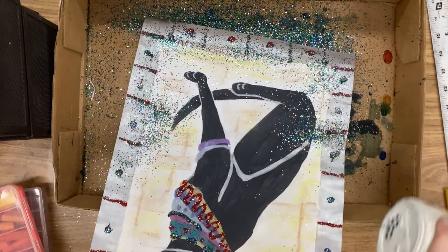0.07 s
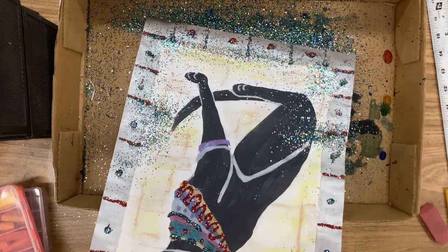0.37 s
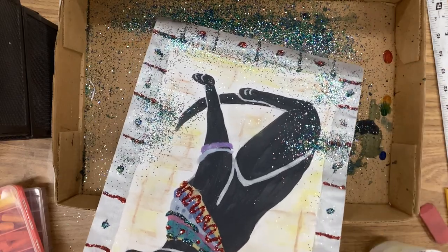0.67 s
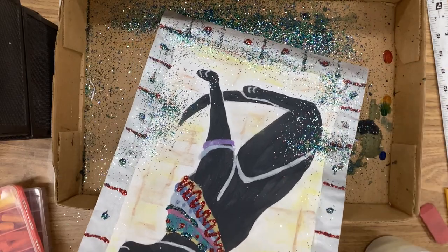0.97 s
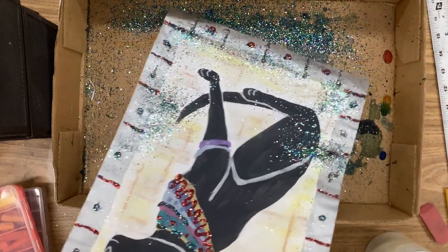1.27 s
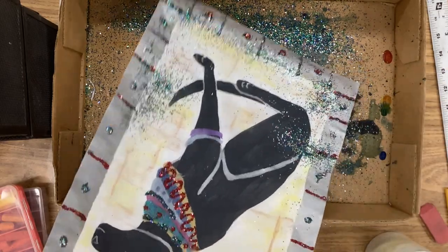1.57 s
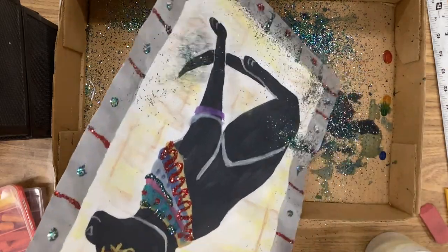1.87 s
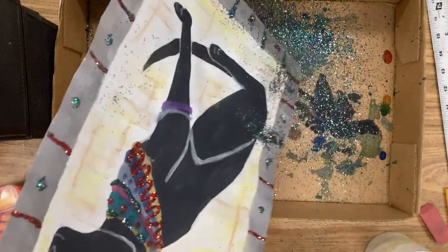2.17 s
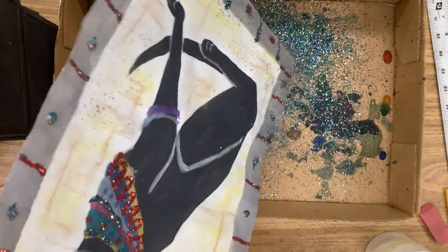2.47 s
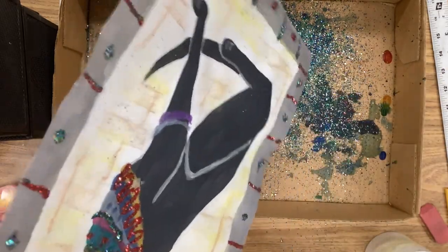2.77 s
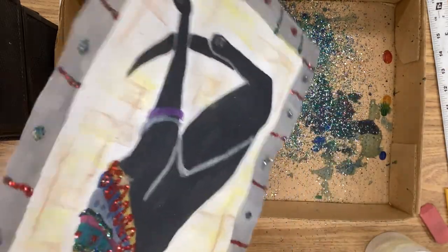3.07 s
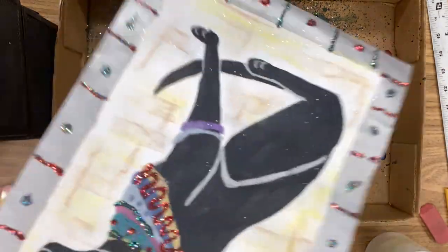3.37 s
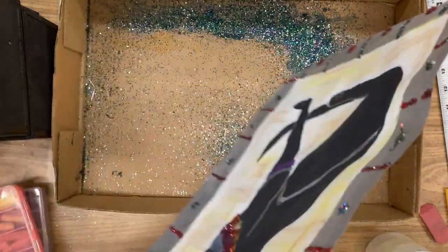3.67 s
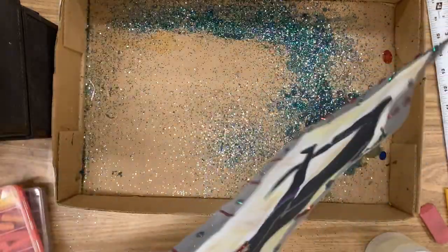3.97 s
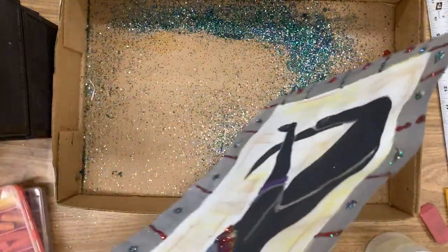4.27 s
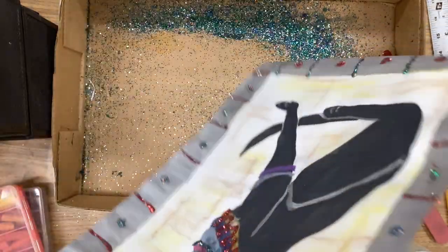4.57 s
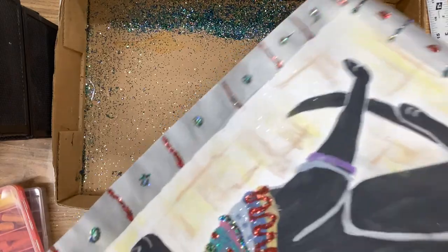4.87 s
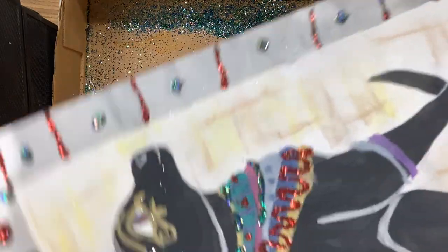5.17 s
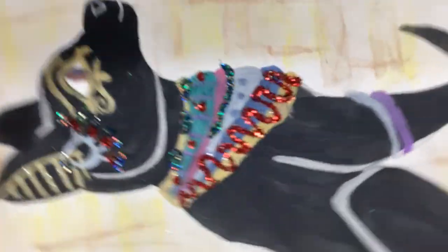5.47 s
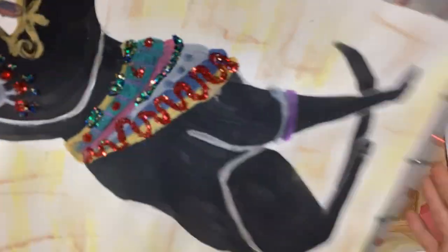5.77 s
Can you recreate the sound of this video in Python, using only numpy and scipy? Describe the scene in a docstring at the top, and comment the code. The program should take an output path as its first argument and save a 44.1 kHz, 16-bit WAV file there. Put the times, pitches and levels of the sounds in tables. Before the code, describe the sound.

Stiff paper scrapes and knocks a cardboard tray, glitter hisses off it, then the sheet is shaken with short snaps.

```python
"""A small room with murmuring ventilation, where a painted sheet is tipped over a cardboard tray.
Its edge scrapes and knocks the tray, and loose glitter hisses off it in thousands of tiny impacts.
Then the stiff paper is shaken clean: it rubs in the hand, creaks, pushes puffs of air and buckles
with short snaps that the room answers. Dry paint and large flakes tick throughout."""
import sys
import numpy as np
from scipy import signal
from scipy.fft import rfft, irfft
from scipy.io import wavfile
from scipy.ndimage import uniform_filter1d

SR = 44100
rng = np.random.default_rng(int(sys.argv[2]) if len(sys.argv) > 2 else 0)


def wrap_up_sound(samples):
    """Save the sound to the file named by the first command line argument, as 16-bit audio."""
    columns = np.atleast_2d(samples).T
    # keep every value between -1 and 1, then stretch to whole-number steps
    tamed = np.clip(columns, -1, 1)
    steps = np.round(tamed * 32767).astype(np.int16)
    wavfile.write(sys.argv[1], SR, steps)


N = 256662

# spectrum of flakes sliding and landing: f/Hz, level/dB
FLAKE_SPECTRUM = [(600, -15), (1400, 0), (2600, 6.5), (3600, 4.5), (4500, -1.5), (5500, -1), (8000, 0),
                  (11500, 0), (15500, -4.5)]
# spectrum of paper scraping cardboard: f/Hz, level/dB
SCRAPE_SPECTRUM = [(200, -16), (450, -10.5), (660, 6), (900, 3.5), (1200, 0.5), (1750, -1), (2050, 1),
                   (2700, 0.5), (3600, -4), (4500, -13), (5300, -9.5), (6200, -18), (14000, -31)]


def amp(db):
    """Decibels to gain."""
    return 10 ** (np.asarray(db) / 20)


def unit(x):
    """Scales to rms 1."""
    return x / np.sqrt(np.mean(x ** 2) + 1e-20)


def read(points, hz):
    """Reads a table on a log-frequency axis."""
    f, value = np.transpose(points)
    return np.interp(np.log(hz + 1), np.log(f), value)


def add(mix, s, sound):
    """Mixes a sound in at time s."""
    part = mix[round(s * SR):][:len(sound)]
    part += sound[:len(part)]


def colour(x, spectrum, size=4096):
    """Minimum-phase EQ with the given spectrum."""
    log_gain = np.log(amp(read(spectrum, abs(np.fft.fftfreq(size, 1 / SR)))))
    taps = np.fft.ifft(np.exp(np.conj(signal.hilbert(log_gain)))).real
    return signal.fftconvolve(x, taps[:size // 2])[:len(x)]


def lowpass(x, hz, order=2):
    """Dulls a sound above hz."""
    return signal.sosfilt(signal.butter(order, min(hz, SR / 2 - 1), fs=SR, output="sos"), x)


def wander(depth_db, up_to_hz):
    """A gain that wavers at random, by depth_db rms."""
    slow = np.fft.rfftfreq(N, 1 / SR) < up_to_hz
    drift = unit(irfft(rfft(rng.standard_normal(N)) * slow, N))
    return amp(depth_db * drift)


def grains(spectrum, per_s, spread_db):
    """A texture of tiny impacts at random moments, most small and a few large, at rms 1."""
    size = amp(spread_db * np.minimum(rng.exponential(1, N), 5))
    impacts = size * rng.standard_normal(N) * (rng.random(N) < per_s / SR)
    return unit(colour(impacts, spectrum))


def burst(envelope, spectrum, bright_hz):
    """A burst of coloured noise with the energy of its envelope."""
    noise = colour(envelope * rng.standard_normal(len(envelope)), spectrum)
    return unit(lowpass(noise, bright_hz, order=3)) * np.sqrt(np.mean(envelope ** 2))


def ring(t, hz, fade_s, rise_s=0.00038):
    """One resonance swings up and dies away."""
    return np.sin(2 * np.pi * hz * t) * (1 - np.exp(-t / rise_s)) * np.exp(-t / fade_s)


def ventilation(level_db=-51.5):
    """Room tone: the steady low murmur of moving air."""
    # spectrum of the murmur: f/Hz, level/dB
    spectrum = [(25, -60), (38, -34), (55, 0), (75, -2.5), (100, -4.5), (140, 5), (200, -4), (400, -10.5),
                (900, -20.5), (1500, -21.5), (2200, -28.5), (4300, -33.5), (6300, -49), (15000, -42)]
    murmur = unit(colour(rng.standard_normal(N), spectrum))
    return amp(level_db) * murmur * wander(0.15, up_to_hz=16)


def strokes(rows, sag_db=-4.5, release_s=0.032):
    """Envelopes of friction and of stirred glitter: each stroke takes hold, slackens and lets go."""
    friction, stirred = np.zeros(N), np.zeros(N)
    t = np.arange(SR) / SR
    for s, length, attack, rub_db, glitter_db in rows:
        hold = np.minimum(t / attack, 1) * amp(sag_db * np.minimum(t / length, 1))
        shape = hold * np.exp(-np.maximum(t - length, 0) / release_s)
        add(friction, s, amp(rub_db) * shape)
        add(stirred, s, amp(glitter_db) * shape)
    return friction, stirred


def rim_drags():
    """Stroke envelopes of the sheet being dragged over the tray's rim."""
    # drags: t/s, length/s, attack/s, scrape level/dB, stirred glitter level/dB
    drags = [(0, 0.085, 0.0013, -58, -48), (.1, 0.28, 0.019, -77, -61.5), (.37, 0.097, .08, -44, -53.5),
             (.48, 0.23, 0.048, -54, -63), (.7, .23, 0.24, -43, -51), (.98, 0.13, 0.056, -43.5, -51),
             (1.15, 0.26, 0.033, -45, -54), (1.42, 0.25, 0.046, -56, -63.5),
             (1.595, 0.2, 0.029, -49.5, -62), (1.82, 0.31, .03, -61, -66)]
    return strokes(drags)


def rubbing(dragging, sliding):
    """Paper fibres catch and slip on the cardboard and on the fingers, under uneven pressure."""
    # spectrum of paper rubbing on skin: f/Hz, level/dB
    finger_spectrum = [(200, -22), (700, -7), (1400, 1), (2000, -3), (2750, 5), (3600, -3), (4600, -4),
                       (5300, -1), (6200, -15.5), (11000, -28), (15000, -37)]
    on_tray = grains(SCRAPE_SPECTRUM, per_s=8000, spread_db=0.1) * dragging
    in_hand = grains(finger_spectrum, per_s=3000, spread_db=2) * sliding
    pressure = wander(1.3, up_to_hz=45)
    return (on_tray + in_hand) * pressure


def glitter(stirred, edge_s=0.06):
    """Thousands of flakes slide and land: one long pour, and a small rush with every stroke."""
    # envelope of the pour off the tilted sheet: t/s, level/dB
    pour_curve = [(1.6, -74), (1.68, -52), (2.07, -50), (2.34, -53), (2.65, -50.5), (2.95, -59), (3.2, -55),
                  (3.45, -72), (3.68, -90)]
    s, db = np.transpose(pour_curve)
    t = np.arange(N) / SR
    outside_s = abs(t - np.clip(t, s[0], s[-1]))
    pour = amp(np.interp(t, s, db)) * np.exp(-outside_s / edge_s)
    hiss = grains(FLAKE_SPECTRUM, per_s=12000, spread_db=1.5)
    coarse_flakes = amp(-17) * grains(FLAKE_SPECTRUM, per_s=45, spread_db=6)
    return (hiss + coarse_flakes) * (pour + stirred) * wander(1, up_to_hz=57)


def early_reflections(x):
    """Nearby surfaces repeat a sound and give it a faintly hollow colour."""
    # echoes off the tray's walls and the table: delay/s, level/dB
    echoes = [(.0019, -24), (.0047, -15.5), (.0083, -22)]
    out = x.copy()
    for delay, db in echoes:
        add(out, delay, amp(db) * x)
    return out


def knocks(scuff_s=0.011, rise_s=0.00057):
    """The sheet's edge lands on the tray: a short scuff, and the cardboard booms."""
    # landings: t/s, boom level/dB, hardness as a cutoff/Hz, ring time factor, scuff level/dB
    landings = [(0.8858, -35, 3000, 0.99, -32), (1.038, -26, 380, 1, -35)]
    # the tray's modes: f/Hz, level/dB, t60/s
    modes = [(192, -12, 0.25), (288.6, -6.5, 0.22), (338, -9.5, 0.37), (397, 8.5, 0.019), (612, -5, 0.22),
             (687, -7.5, 0.24), (820, 1, 0.026), (1260, -18, .12), (1820, -35, 0.072), (2410, 1, 0.023)]
    out, t = np.zeros(N), np.arange(SR // 2) / SR
    for s, db, hard_hz, stretch, scuff_db in landings:
        boom = sum((-1) ** k * amp(mode_db) * ring(t, hz, t60 * stretch / np.log(1000), rise_s)
                   for k, (hz, mode_db, t60) in enumerate(modes))
        scuff = burst(np.exp(-t / scuff_s), SCRAPE_SPECTRUM, bright_hz=2850)
        add(out, s, amp(db) * lowpass(boom, hard_hz, order=1) + amp(scuff_db) * scuff)
    return out


def room(x, predelay_s=0.006):
    """A diffuse tail: each band stores the sound's energy and lets it go at its own speed."""
    # tone of the room's answer: f/Hz, level/dB
    tone = [(100, 2.5), (300, -8), (1000, -14.5), (1800, -17), (3000, -11.5), (5000, -7.5), (8000, -2),
            (14000, -9)]
    # reverb times: f/Hz, t60/s
    reverb_times = [(150, 0.44), (600, 0.15), (2500, 0.45), (6000, 0.31), (13000, 0.26)]
    hz, t, bands = signal.stft(colour(x, tone), SR, nperseg=256)
    power = uniform_filter1d(abs(bands) ** 2, size=3, axis=0)
    # higher bands share their energy with more neighbours
    power[8:] = uniform_filter1d(power, size=9, axis=0)[8:]
    decay = amp(-60 * t[:300] / read(reverb_times, hz)[:, None]) ** 2
    stored = signal.fftconvolve(power, decay / decay.sum(1, keepdims=True), axes=1)[:, :len(t)]
    # countless reflections leave only the energy: the phases are random
    scatter = signal.stft(rng.standard_normal(N), SR, nperseg=256)[2]
    band_gain = np.sqrt(abs(stored) / np.mean(abs(scatter) ** 2))
    tail = signal.istft(scatter * band_gain, SR, nperseg=256)[1]
    return np.pad(tail, (round(predelay_s * SR), 0))[:N]


def ticks(fade_s=0.0011, ring_db=2):
    """Dry paint and large flakes click: a tiny ping in a broad band of noise around its pitch."""
    # clicks: t/s, level/dB, f/Hz
    clicks = [(.9797, -30.5, 3700), (1.727, -34.5, 7900), (2.389, -39.5, 7000), (2.497, -41, 7040),
              (2.705, -36.5, 8000), (2.818, -39, 5550), (2.864, -33, 7940), (3.138, -34, 5530),
              (3.311, -45, 6900), (3.544, -50, 2800), (3.8465, -39, 3500), (3.965, -43.5, 6000),
              (4.2614, -42, 7240), (4.426, -32.5, 6100), (4.885, -51, 14000), (4.973, -60, 15000),
              (5.44, -40, 14000), (5.596, -39.5, 4460)]
    out, t = np.zeros(N), np.arange(SR // 30) / SR
    for s, db, hz in clicks:
        band = [(hz / 3, -26), (hz * .7, -3), (hz, 0), (hz * 1.4, -4), (hz * 3, -22)]
        noise = burst(np.exp(-t / fade_s), band, bright_hz=15100)
        ping = amp(ring_db) * ring(t, hz, fade_s)
        add(out, s, amp(db) * (noise + ping))
    return out


def buckle(mix, s, db, build_s, fade_s, bright_hz, ring_hz, ring_db):
    """Mixes in one buckle: creaking builds, a patch pops through and rings, and flakes shake loose."""
    # spectrum of the cracking sheet: f/Hz, level/dB
    crack_spectrum = [(50, -24), (120, -15), (400, -4.5), (620, -5), (950, -0.5), (1600, -1.5),
                      (2000, -2.5), (2800, -0.5), (3400, -7.5), (4200, -11), (5100, -18), (6500, -15),
                      (11000, -20.5), (14000, -20)]
    # notes of the stiff painted skin, which only bright buckles reach: f/Hz, level/dB, fade/s
    paint_modes = [(2800, 3, 0.0015), (5010, -3, 0.0021)]
    lead_s, precreak_db, precreak_s = 0.06, -21.5, 0.0049
    t = np.arange(SR // 5) / SR - lead_s
    before, after = np.maximum(-t, 0), np.maximum(t, 0)
    precreak = amp(precreak_db) * np.exp(-before / precreak_s)
    jolt = np.maximum(np.exp(-before / build_s), precreak) * np.exp(-after / fade_s)
    crack = amp(0.5) * burst(jolt, crack_spectrum, bright_hz)
    spray = amp(-27) * burst(jolt, FLAKE_SPECTRUM, bright_hz=11300)
    patch = amp(ring_db) * ring(after, ring_hz, fade_s)
    notes = sum(amp(note_db) * ring(after, hz, fade) for hz, note_db, fade in paint_modes)
    paint = lowpass(notes, bright_hz, order=3)
    add(mix, s - lead_s, amp(db) * (crack + spray + patch + paint))


def creaks():
    """Gradual bends of the whole sheet swell and fade, all with the same colour."""
    # bends: peak t/s, level/dB, time scale/s
    bends = [(1.273, -40, 0.0045), (2.222, -43.5, 0.004), (2.375, -49, 0.017), (2.689, -45, 0.0088),
             (2.847, -36, 0.011), (3.004, -24, 0.0056), (3.156, -29.5, 0.013), (3.5, -57.5, 0.029),
             (3.856, -22.5, 0.0033), (3.894, -22.5, 0.0053), (4.207, -39.5, 0.0025), (4.389, -23.5, 0.0057),
             (4.429, -24, .004), (5.693, -40.5, 0.0082)]
    out = np.zeros(N)
    for s, db, span in bends:
        buckle(out, s, db, 0.93 * span, 1.2 * span, bright_hz=3780, ring_hz=1517, ring_db=-3.5)
    return out


def snaps(build_s=0.00072, db_per_octave=17.5):
    """Sudden buckles, brighter the smaller the patch and the harder the snap."""
    # patches popping through: t/s, level/dB, fade/s, ring f/Hz, relative ring level/dB
    pops = [ (1.4768, -45, 0.0023, 624, 14.5), (1.486, -48, 0.0052, 376, 16.5),
            (1.7337, -35.5, .0075, 790, 5), (1.8262, -31, 0.0035, 1305, 14),
            (2.9822, -41, 0.0023, 2000, -12), (3.0143, -17, 0.005, 1057, -0.5),
            (3.1607, -20, 0.0046, 1570, 4.5), (3.17, -34.5, 0.0031, 1120, 14.5),
            (3.189, -25, 0.0052, 1220, 1.5), (3.864, -18.5, 0.0061, 910, -8.5),
            (3.965, -40, 0.02, 970, -13), (3.989, -26, 0.0071, 866, -26), (4.217, -26.5, 0.012, 1097, -3.5),
            (4.2632, -23.5, 0.0059, 1347, 1.5), (4.5692, -12, 0.0033, 956, 1),
            (5.1976, -19.5, 0.005, 1210, -1), (5.318, -29, 0.0074, 783, -3), (5.615, -36, 0.012, 559, 2.5),
            (5.7171, -29.5, 0.0025, 1335, 12.5), (5.727, -38, 0.0041, 610, 12)]
    out = np.zeros(N)
    for s, db, fade_s, ring_hz, ring_db in pops:
        smallness = (ring_hz / 1200) ** 0.55
        hardness = 2 ** ((db + 28) / db_per_octave)
        bright_hz = 3220 * smallness * hardness
        buckle(out, s, db, build_s, fade_s, bright_hz, ring_hz, ring_db)
    return out


def puffs(lead_s=0.1):
    """Each swing of the flexing sheet gives a soft low push of air."""
    # swings: peak t/s, level/dB, half-width/s
    swings = [(2.683, -49, 0.019), (2.845, -42.5, 0.022), (2.993, -32.5, 0.0086), (3.133, -31, 0.0045),
              (3.859, -36, 0.017), (4.25, -45.5, 0.045), (4.389, -35.5, 0.013), (5.205, -41, 0.018),
              (5.625, -44, 0.02), (5.708, -42, 0.017)]
    spectrum = [(40, -40), (90, 4), (150, -3.5), (300, -2.0), (900, -11)]  # f/Hz, level/dB
    out, t = np.zeros(N), np.arange(SR // 5) / SR - lead_s
    for s, db, half_width in swings:
        swell = np.exp(-(t / half_width) ** 2)
        add(out, s - lead_s, amp(db) * burst(swell, spectrum, bright_hz=420))
    return out


def hand_slides():
    """Stroke envelopes of the sheet sliding in the hand."""
    # slides: t/s, length/s, attack/s, rub level/dB, stirred glitter level/dB
    slides = [(3.25, 0.052, 0.06, -50.5, -78), (3.39, .16, 0.056, -78, -76), (4.02, 0.16, 0.083, -68, -65),
              (4.2, 0.073, 0.039, -68, -57), (4.37, 0.076, .02, -75, -63), (4.68, 0.35, 0.075, -62.5, -91),
              (5.035, 0.23, 0.046, -60, -62), (5.25, 0.21, .04, -62, -63.5), (5.44, 0.04, 0.042, -51, -57),
              (5.52, 0.1, 0.07, -49, -54), (5.625, 0.077, 0.041, -42.5, -48.5)]
    return strokes(slides)


def scene():
    """Paper, tray and glitter close up, over room tone; only the hits and clicks feed the reverb."""
    dragging, stirred_by_drag = rim_drags()
    sliding, stirred_by_hand = hand_slides()
    buckling = snaps() + creaks()
    hits = buckling + knocks() + puffs()
    # the table top mirrors every buckle and makes it hollow
    add(hits, 0.002068, amp(-19) * buckling)
    clicks = ticks()
    flakes = glitter(stirred_by_drag + stirred_by_hand)
    rustle = amp(-0.04) * early_reflections(flakes + rubbing(dragging, sliding))
    reverb = room(hits + amp(-1.5) * clicks)
    return (hits + clicks + reverb + rustle + ventilation())[None]


def record(dry, top_hz=15750):
    """The microphone softens the deep bass and the top, and a steep high cut follows."""
    # microphone response: f/Hz, level/dB
    response = [(22, -31), (45, -15.5), (70, -0.5), (11500, 0.5), (13000, -9), (15500, -15)]
    high_cut = signal.firwin(511, top_hz, window=("kaiser", 9), fs=SR)
    return signal.oaconvolve(colour(dry[0], response), high_cut, "same")[None]


dry = scene()
out = record(dry)
wrap_up_sound(out)
```